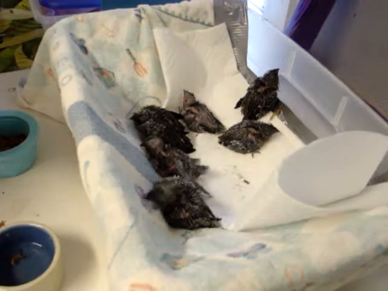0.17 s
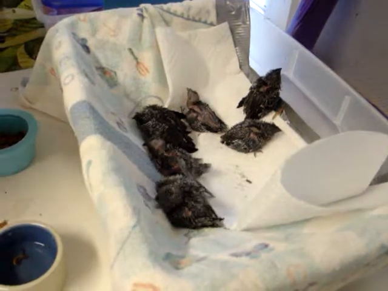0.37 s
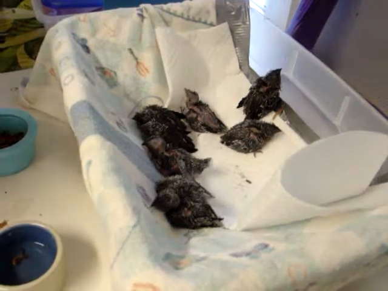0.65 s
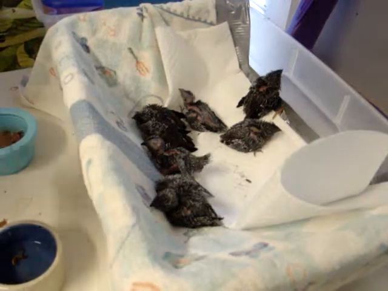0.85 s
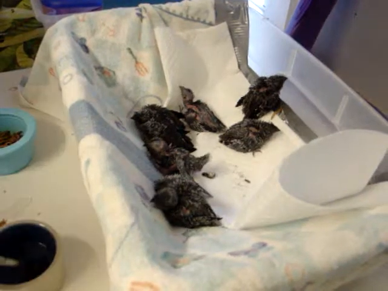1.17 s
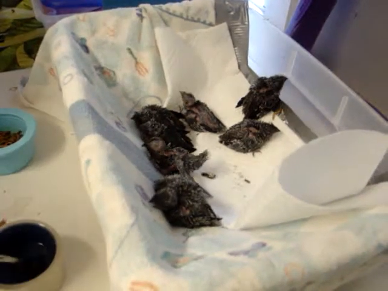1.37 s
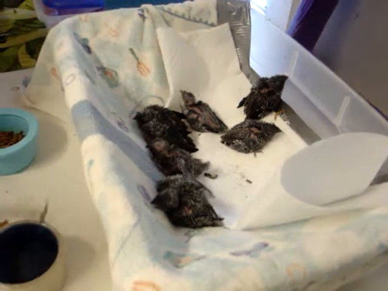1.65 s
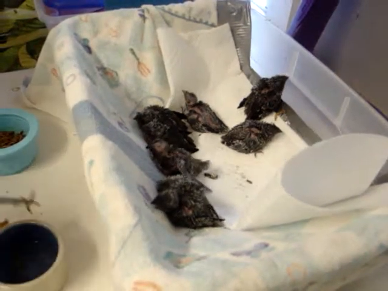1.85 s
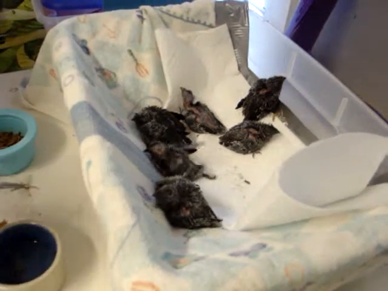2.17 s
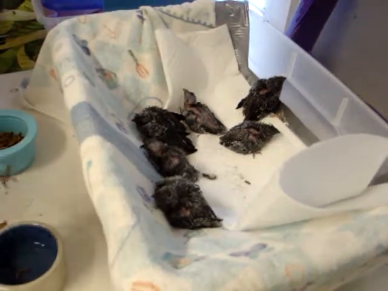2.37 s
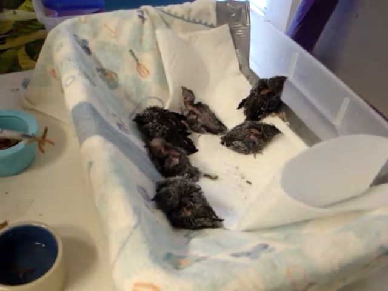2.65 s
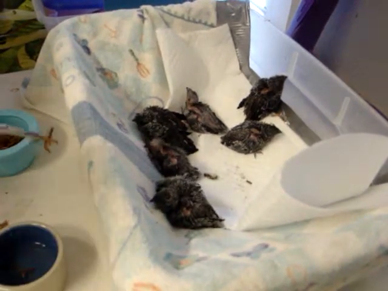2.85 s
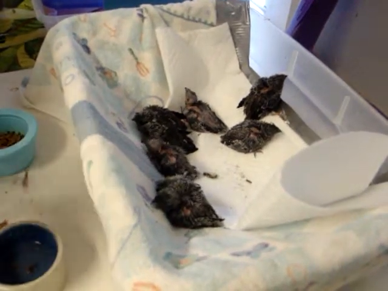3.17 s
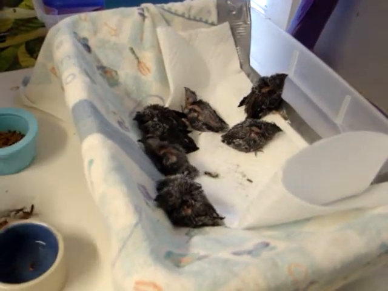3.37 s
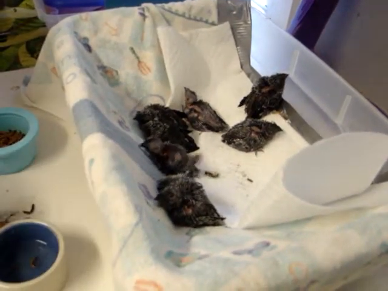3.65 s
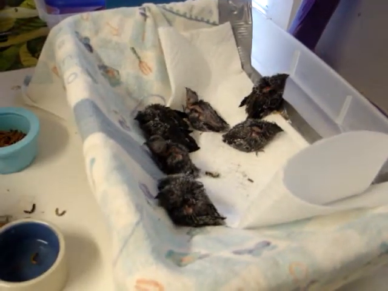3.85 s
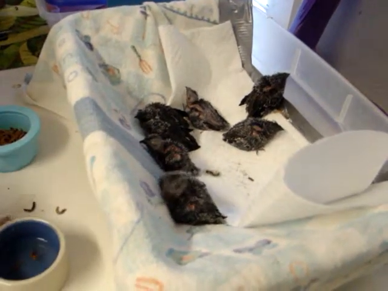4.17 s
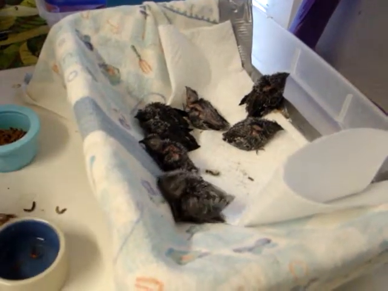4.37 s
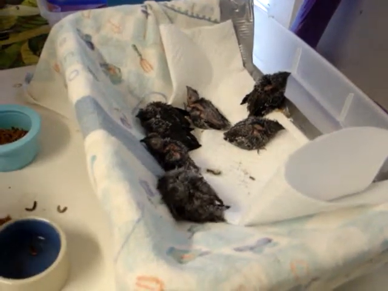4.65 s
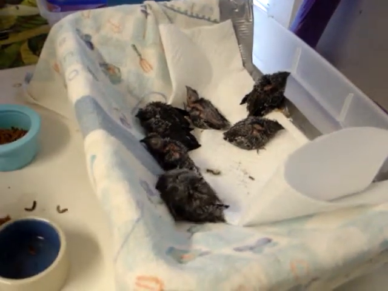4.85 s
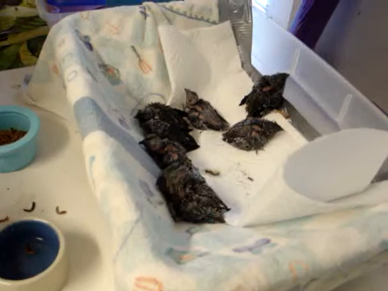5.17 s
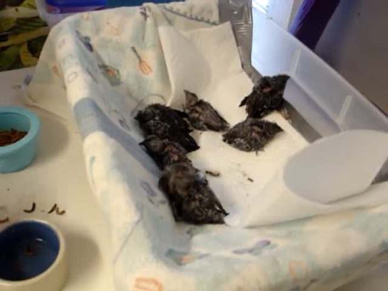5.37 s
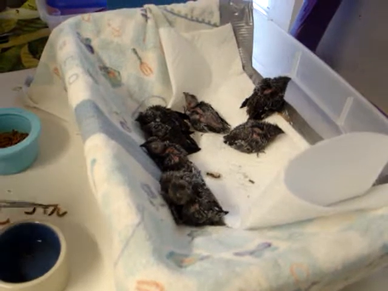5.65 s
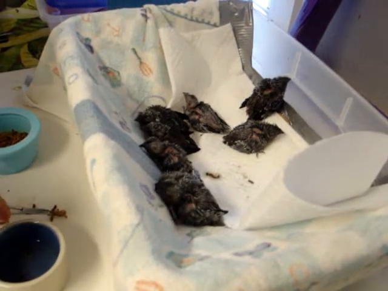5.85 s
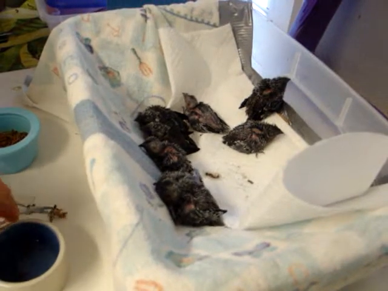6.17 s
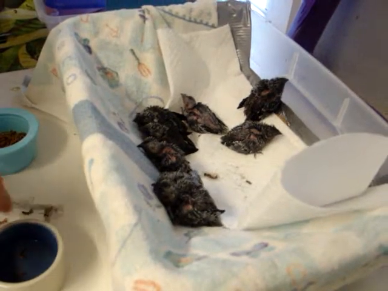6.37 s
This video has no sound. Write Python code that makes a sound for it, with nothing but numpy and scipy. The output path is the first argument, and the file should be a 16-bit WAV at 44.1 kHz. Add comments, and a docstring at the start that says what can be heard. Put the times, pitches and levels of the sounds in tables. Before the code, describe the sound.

Several nestlings beg indoors with sharp tiny chirps, raspy little squawks and hoarse sliding whistles, over a wavering fan drone and soft air noise.

```python
"""Nestlings in a plastic tub beg for food, close to a small microphone in a hard-walled room.
Short arched chirps break into harsh falling squawks; long hoarse whistles slide down, others answer from
further off. Each call is a gliding tone with overtones, made hoarse by random wobble; breath is a rougher copy.
A fan motor and mains hum drone underneath as wavering sines with a bed of air noise; claws scratch on paper.
Noise tails make the echoes of tub and room; the microphone overloads slightly on the loudest calls."""
import sys
import numpy as np
from scipy import signal
from scipy.fft import rfft, irfft
from scipy.io import wavfile
from scipy.ndimage import uniform_filter1d

SR = 44100
rng = np.random.default_rng(int(sys.argv[2]) if len(sys.argv) > 2 else 0)


def to_linear_factor(level_db):
    """Convert decibel levels (scalar or array-like) to linear amplitude factors."""
    exponent = np.asarray(level_db, float) / 20
    return 10 ** exponent


def put_to_file(sound):
    """Save the sound as 16-bit audio at rate SR, in the file named by the first command-line argument."""
    columns = np.atleast_2d(sound).T  # one column per channel
    safe = np.clip(columns, -1, 1)
    whole_steps = np.round(safe * 32767)
    wavfile.write(sys.argv[1], SR, whole_steps.astype(np.int16))


N = 287091  # length in samples


def colour(points, hz):
    """Gain at each pitch, read from a table of (f/Hz, gain/dB) along a logarithmic pitch scale."""
    table = np.array(points, float)
    return to_linear_factor(np.interp(np.log(np.maximum(hz, 1)), np.log(table[:, 0]), table[:, 1]))


def walk(rate_hz, count):
    """Smooth random curve of spread 1 that turns about rate_hz times a second."""
    k = max(int(SR / rate_hz), 2)
    noise = rng.standard_normal(count + 4 * k)
    smooth = uniform_filter1d(uniform_filter1d(noise, k), k)[2 * k:2 * k + count]
    return smooth * np.sqrt(1.5 * k)  # smoothing shrinks the spread; bring it back to 1


def add(out, start_s, x):
    """Mix a sound into out from its start time on."""
    i = max(int(start_s * SR), 0)
    out[i:i + len(x)] += x[:len(out) - i]


def span(length_s):
    """Progress through a note, from 0 to 1."""
    return np.linspace(0, 1, int(length_s * SR))


def swell(u, rise, fall):
    """Loudness curve over a note: rise and fall are shares of its length."""
    fade_in = np.sin(np.pi / 2 * np.clip(u / rise, 0, 1)) ** 2
    fade_out = np.sin(np.pi / 2 * np.clip((1 - u) / fall, 0, 1)) ** 2
    return fade_in * fade_out


# what throat and beak let through: (f/Hz, gain/dB)
THROAT = [(1500, -19.5), (2200, -1), (3200, 1.5), (4400, 6), (6000, 2), (8000, -1), (10000, -14.5)]


def voice(hz, rough, overtone_db, flutter_hz, count=4):
    """A membrane in the syrinx, the bird's voice organ; roughness scatters its overtones into sidebands."""
    phase, out = 2 * np.pi * np.cumsum(hz) / SR, 0
    rough = np.clip(rough, 0, 1)
    for k in range(1, count + 1):
        # random shaking of amplitude and phase replaces the steady tone as roughness grows
        shake = walk(flutter_hz, len(hz)) + 1j * walk(flutter_hz, len(hz))
        wobble = np.sqrt(1 - rough) * np.sqrt(2) + np.sqrt(rough) * shake
        audible = k * hz < .45 * SR
        gain = to_linear_factor(overtone_db * (k - 1)) * colour(THROAT, k * hz) * audible
        out = out + gain * np.imag(wobble * np.exp(1j * k * phase))
    return out


# fan over time: (t/s, shaft tone f/Hz, drone level/dB)
FAN = [(0.0, 75.4, -39.5), (0.69, 75.5, -45), (1.36, 72.8, -48.5), (1.68, 74, -43), (2.55, 73.3, -42),
       (2.96, 70.56, -43), (3.46, 76.7, -37.5), (4.21, 77.1, -36.5), (4.679, 77.11, -38.5),
       (6.47, 76.6, -37), (6.51, 78.7, -36)]
# tones at multiples of the shaft tone: (multiple, relative level/dB)
FAN_ORDERS = [(2, -18), (3, -14), (4, -10), (5, -1.5), (6, -8.5), (7, -8), (8, -15.5)]
# hum lines: (f/Hz, level/dB)
HUM = [(57, -59.5), (69, -51), (120, -47.5), (620, -73.5), (824, -50.5), (904, -57), (964, -54.5),
       (1075, -51), (1130, -56.5), (1529, -55.5)]
# tone colour of the moving air: (f/Hz, relative level/dB)
AIR = [(79, -22), (135, -5), (187, -10), (327, -0.5), (364, -1.5), (413, -4.5), (685, -7.5), (1080, -7),
       (1220, -8.5), (1510, -8.5), (3730, -20.5), (5550, -22.5), (9200, -29.5), (10100, -50), (13100, -66),
       (22000, -120)]


def drone():
    """Fan tones follow the shaft and waver; hum lines keep their pitch but waver too; air is shaped noise."""
    t = np.arange(N) / SR
    s, shaft_hz, db = np.transpose(FAN)
    turn = 2 * np.pi * np.cumsum(np.interp(t, s, shaft_hz)) / SR
    fan, hum = np.zeros(N), np.zeros(N)
    for k, order_db in FAN_ORDERS:
        fan += to_linear_factor(order_db + 2.5 * walk(9, N)) * np.sin(k * turn + .6 * walk(6, N))
    for hz, hum_db in HUM:
        hum += to_linear_factor(hum_db + 2.3 * walk(10.2, N)) * np.sin(2 * np.pi * hz * t + .4 * walk(5.2, N))
    air = irfft(rfft(rng.standard_normal(N)) * colour(AIR, np.fft.rfftfreq(N, 1 / SR)), N)
    tones = np.sqrt(2) * (fan * to_linear_factor(np.interp(t, s, db)) + hum)
    return tones + to_linear_factor(-36.5) * air / air.std()


def arch(u, first_hz, top_hz, last_hz):
    """Pitch curve that climbs to a crest and then drops away faster."""
    crest = 0.62  # share of the length
    climb = np.clip(1 - u / crest, 0, 1)
    drop = np.clip((u - crest) / (1 - crest), 0, 1)
    return top_hz - (top_hz - first_hz) * climb ** 2.3 - (top_hz - last_hz) * drop ** 1.713


# arched chirps: (start t/s, length t/s, top f/Hz, last f/Hz, level/dB)
ARCHES = [(0.023, 0.035, 7670, 5740, -14), (0.286, 0.04, 8250, 4500, -12),
          (0.527, 0.043, 8400, 6500, -16.5), (0.845, 0.03, 8110, 4720, -12),
          (1.144, 0.044, 7820, 5060, -15), (1.367, 0.057, 3860, 2630, -43),
          (1.892, 0.029, 7200, 5600, -21.5), (2.559, 0.035, 7700, 4680, -22.5),
          (2.898, 0.029, 7370, 4260, -20), (3.246, 0.037, 6230, 4770, -21.5),
          (3.925, 0.044, 5590, 3250, -24.5), (4.203, 0.036, 8210, 5900, -24.5),
          (4.56, 0.012, 7930, 7050, -14.5), (4.841, 0.017, 8230, 7530, -22), (4.908, 0.03, 4620, 4980, -32),
          (5.101, 0.029, 7580, 7300, -28), (5.851, 0.035, 7230, 5600, -27.5)]
# plunging chirps: (start t/s, length t/s, first f/Hz, last f/Hz, level/dB)
PLUNGES = [(0.056, 0.01, 5460, 1930, -44), (0.32, 0.0087, 6000, 2230, -41),
           (0.562, 0.015, 5100, 2970, -20.5), (0.871, 0.015, 6120, 2560, -26),
           (1.171, 0.011, 5620, 2600, -19), (1.916, 0.01, 5310, 2340, -21),
           (2.157, 0.021, 5120, 4300, -31.5), (2.583, 0.021, 5000, 2150, -24),
           (2.925, 0.013, 5250, 2950, -33), (3.114, 0.03, 6860, 3360, -28.5),
           (3.266, 0.012, 5385, 2070, -21.5), (3.452, 0.042, 3033, 2310, -30.5),
           (3.731, 0.042, 5690, 2090, -33.5), (3.819, 0.032, 4800, 2490, -33.5),
           (3.956, 0.023, 4950, 2130, -26), (3.982, 0.012, 5170, 2620, -30.5),
           (4.144, 0.048, 5320, 2265, -26.5), (4.239, 0.021, 4290, 2300, -20.5),
           (4.487, 0.026, 5340, 4280, -32), (4.572, 0.018, 4410, 2970, -18.5),
           (4.855, 0.018, 4400, 3120, -15.5), (4.512, 0.03, 4600, 2240, -34.5),
           (5.05, 0.022, 5300, 4700, -35), (5.067, 0.016, 3820, 2670, -29.5),
           (5.086, 0.016, 5040, 3750, -36.5), (5.121, 0.021, 4615, 3080, -15),
           (5.578, 0.022, 4580, 2960, -18), (5.742, 0.007, 2940, 2530, -28.5),
           (5.873, 0.023, 4600, 2166, -18.5)]


def chirp_glides():
    """Start, progress, pitch and level of every chirp; longer plunges cling longer to their first pitch."""
    for s, length, top_hz, last_hz, db in ARCHES:
        u = span(length)
        yield s, u, arch(u, 0.7 * top_hz, top_hz, last_hz), db
    hold_s = 0.022
    for s, length, first_hz, last_hz, db in PLUNGES:
        u = span(length)
        yield s, u, first_hz + (last_hz - first_hz) * u ** (1 + length / hold_s), db


def chirps(out):
    """Thin glides inside a haze of breath; low-pitched ones carry stronger overtones."""
    for s, u, hz, db in chirp_glides():
        count = len(u)
        overtone_db = -8 if hz.max() < 3300 else -22
        # the slacker the membrane, the lower and the more ragged the tone
        slack = np.clip((7200 - hz) / 3000, .2, .55)
        if hz[0] < 3300:
            slack = .06  # a smaller bird's low peeps stay clear
        line = voice(hz, slack, overtone_db, 984)
        # the tone comes in beads, around 210 a second
        bead_hz = 210 + 50 * walk(67.6, count)
        beads = 1 + 0.54 * np.sin(2 * np.pi * np.cumsum(bead_hz) / SR + 2 * np.pi * rng.random())
        # every other cycle differs a little: a faint strand at half pitch
        line += to_linear_factor(-27 + 6 * walk(120, count)) * voice(hz / 2, .85, 0, 1400, count=1)
        # air rushing past the membrane, in gusts, growing towards the end of the glide
        gusts = to_linear_factor(-7.5 + 8.7 * np.clip(walk(246, count), -3, 1.2))
        breath = gusts * (0.082 + u) * voice(hz, 0.91, -10.5, 5000, count=2)
        add(out, s, to_linear_factor(db) * swell(u, 0.42, 0.2) * (beads * line + breath))


# low rasping squawks and peeps: (start t/s, length t/s, first f/Hz, level/dB, roughness: 0 clear, about 1 raspy)
SQUAWKS = [(0.049, 0.04, 2697, -26.5, 0.8), (0.32, 0.023, 3054, -31, 0.8), (0.724, 0.03, 3340, -35.5, 0.05),
           (0.872, 0.02, 2994, -26, 0.37), (1.18, 0.037, 2850, -28.5, 0.6),
           (1.559, 0.024, 3050, -34.5, 0.2), (1.797, 0.02, 3230, -43, 0.08), (1.913, 0.047, 3100, -25, 0.5),
           (2.165, 0.047, 2645, -35.5, 0.88), (2.294, 0.057, 3330, -26, 0.78),
           (2.472, 0.035, 2840, -33, 1.2), (2.59, 0.042, 2636, -26, 0.9), (2.922, 0.045, 3205, -26, 0.74),
           (3.263, 0.038, 3053, -24.5, 0.53), (3.79, 0.035, 3310, -31, 0.1), (3.84, 0.022, 2500, -42, 0.5),
           (3.958, 0.039, 2377, -31, 1), (4.236, 0.027, 2400, -25.5, 0.5), (4.581, 0.039, 2540, -30.5, 0.8),
           (4.873, 0.027, 2404, -27, 0.08), (5.145, 0.041, 2760, -33.5, 0), (5.585, 0.029, 2395, -32, 0),
           (5.758, 0.022, 2310, -30, 0.08), (5.887, 0.063, 2376, -30, 0.7)]


def squawks(out):
    """The pitch settles like a relaxing spring; rougher means wider sidebands and richer overtones."""
    rest_hz = 2125
    for s, length, first_hz, db, rough in SQUAWKS:
        u = span(length)
        hz = rest_hz + (first_hz - rest_hz) * np.exp(-3 * u)
        tone = voice(hz, rough, -5 + 3 * rough, 700 + 2500 * rough)
        level = to_linear_factor(db + 4.6 * rough * walk(220, len(u)))
        add(out, s, level * swell(u, 0.07, 0.62) * tone)


# whistles of birds further off: (start t/s, length t/s, first f/Hz, last f/Hz, level/dB)
DISTANT = [(0.118, 0.16, 6230, 5220, -33.5), (0.333, 0.08, 5670, 5510, -31),
           (0.99, 0.25, 5340, 5250, -41.5), (1.059, 0.26, 6170, 6000, -41), (1.202, 0.12, 6600, 6200, -37),
           (1.316, 0.05, 6200, 5250, -35.5), (1.468, 0.458, 5650, 5910, -39.5),
           (1.527, 0.39, 6450, 6070, -44), (1.791, 0.068, 8000, 8070, -42.5),
           (1.956, 0.18, 6500, 7220, -41.5), (2.005, 0.14, 4750, 5260, -45.5),
           (2.631, 0.078, 5400, 5180, -39.5), (2.84, 0.028, 5020, 5120, -40),
           (3.158, 0.16, 6520, 6100, -49), (4.311, 0.18, 5140, 5380, -43.5),
           (5.015, 0.042, 7400, 6470, -43), (5.171, 0.24, 7500, 6530, -42),
           (5.454, 0.048, 5080, 4940, -38.5)]


def distant():
    """Hoarse whistles from further away: a single wobbling tone whose level dips at random."""
    out = np.zeros(N)
    for s, length, first_hz, last_hz, db in DISTANT:
        u = span(length)
        tone = voice(first_hz + (last_hz - first_hz) * u, .42, 0, 600, count=1)
        level = to_linear_factor(db - 9.1 * np.maximum(walk(51, len(u)), 0))
        add(out, s, level * swell(u, 0.055, 0.21) * tone)
    return out


# long begging whistles: (start t/s, length t/s, first f/Hz, level/dB, attack t/s)
WHISTLES = [(0.623, 0.18, 6093, -18.5, 0.013), (2.265, 0.19, 6210, -16, 0.016),
            (3.33, 0.21, 6190, -15.5, 0.046), (4.556, 0.21, 6184, -14.5, 0.05),
            (6.011, 0.24, 6016, -17.5, 0.014)]
# short straight whistles, mostly run-ups to a long one: (start t/s, length t/s, first f/Hz, last f/Hz, level/dB)
RUN_UPS = [(0.561, 0.04, 5040, 5330, -23.5), (0.61, 0.03, 5400, 6100, -26), (2.132, 0.062, 6450, 5820, -29),
           (2.207, 0.13, 5860, 5530, -31.5), (2.247, 0.02, 6300, 6250, -30.5),
           (3.295, 0.082, 5600, 6000, -24.5), (4.473, 0.049, 6320, 5830, -26.5),
           (4.537, 0.022, 5680, 5810, -28.5), (5.485, 0.09, 6350, 5420, -31)]


def whistle_glides():
    """Start, progress, pitch and level of every whistle; long ones sag late and fade, run-ups glide straight."""
    for s, length, first_hz, db, attack_s in WHISTLES:
        u = span(length)
        entry_db = -4.5 * np.clip(1 - u * length / attack_s, 0, 1)
        fade_db = -18 * u ** 3.96
        yield s, u, first_hz * (1 - 0.3 * u ** 2.3), db + entry_db + fade_db
    for s, length, first_hz, last_hz, db in RUN_UPS:
        u = span(length)
        yield s, u, first_hz + (last_hz - first_hz) * u, db + 3.2 * walk(100, len(u))


def whistles():
    """Sliding whistles with a pair of flutter sidebands; hoarser and breathier towards the end."""
    out = np.zeros(N)
    for s, u, hz, db in whistle_glides():
        # the pitch sags further and wavers as the breath runs out
        hz = hz * (1 - .07 * u ** 8 + 0.035 * u ** 2 * walk(90, len(u)))
        flutter_hz = 330 + 60 * walk(40, len(u))
        flutter = 1 + 0.13 * np.sin(2 * np.pi * np.cumsum(flutter_hz) / SR)
        tone = flutter * voice(hz, 0.1 + 0.45 * u ** 2.5, -3.5, 900, count=2)
        breath = to_linear_factor(-10.5) * u ** 3 * voice(hz, 0.77, -9.5, 1300, count=2)
        add(out, s, to_linear_factor(db) * swell(u, 0.018, 0.13) * (tone + breath))
    return out


# gaps of a few milliseconds where a whistle and its echo nearly vanish:
# (middle t/s, size t/ms; the gap reaches about 0.83 sizes each way)
GAPS = [(0.673, 5), (0.6936, 4.1), (0.702, 1.9), (2.2036, 7.6), (2.2653, 2.9), (2.279, 1.8), (2.2843, 2),
        (2.3345, 2), (2.4198, 3.3), (3.3261, 2.6), (3.336, 2.3), (3.3523, 3), (3.3605, 5.6), (3.3752, 2.4),
        (3.403, 6.9), (4.595, 4.1), (4.646, 2.6), (4.656, 4.1), (4.687, 2.4), (6.047, 4.8), (6.118, 2.9),
        (6.135, 4.2), (6.157, 2.7), (6.209, 2.6)]


def gaps():
    """Gain that nearly closes at each listed gap, and at random, mostly shorter gaps in long whistles."""
    every_s, size_ms = 0.06, 2.0  # average spacing and size of the random gaps
    t, gain = np.arange(N) / SR, np.ones(N)
    chance = rng.random((300, 2))
    times = .03 + np.cumsum(2 * every_s * chance[:, 0])
    random_gaps = []
    for s, c in zip(times, chance[:, 1]):
        if any(0 < s - w[0] < .85 * w[1] for w in WHISTLES):
            random_gaps.append((s, size_ms * (.5 + c)))
    for s, gap_ms in GAPS + random_gaps:
        near = slice(int((s - .02) * SR), int((s + .02) * SR))
        gain[near] *= 1 - 0.98 * np.exp(-((t[near] - s) / (0.00083 * gap_ms)) ** 4)
    return gain


# one warble on both sides of the syrinx: (start t/s, length t/s, first f/Hz, last f/Hz, swing f/Hz, level/dB)
WARBLE = [(1.224, 0.13, 3050, 2400, 345, -32.5), (1.221, 0.12, 3900, 2100, 328, -34.5)]


def warble(out):
    """Two tones swing up and down together; the swing dies away."""
    rate_hz, crest_s = 40, 1.2775  # both tones crest at the same moment
    for s, length, first_hz, last_hz, swing_hz, db in WARBLE:
        u = span(length)
        swing = np.cos(2 * np.pi * rate_hz * (s + u * length - crest_s)) * swell(u, 0.084, 0.4)
        hz = first_hz + (last_hz - first_hz) * u ** 3 + swing_hz * swing
        add(out, s, to_linear_factor(db) * swell(u, .1, .15) * voice(hz, .15, -20, 500, count=2))


# scratches of claws on paper: (start t/s, level/dB before filtering, centre f/Hz)
SCRATCHES = [(3.719, -22.5, 2590), (6.317, -17, 1730), (6.3766, -15.5, 1740), (6.4288, -22.5, 1770)]


def scratches(out):
    """Short dull bursts: filtered noise that dies away at once."""
    for s, db, hz in SCRATCHES:
        t = span(0.08) * 0.08
        band = signal.butter(1, [0.71 * hz, 1.25 * hz], "bandpass", fs=SR, output="sos")
        noise = signal.sosfilt(band, rng.standard_normal(len(t)))
        add(out, s, to_linear_factor(db) * np.exp(-t / 0.024276) * noise)


def echo(t60_s, treble_t60_s, gap_s):
    """Diffuse noise tail of energy 1 that starts after a gap; t60 is the time to fall by 60 dB."""
    t = span(.6) * .6
    noise = rng.standard_normal(len(t))
    low = signal.sosfiltfilt(signal.butter(2, 6500, fs=SR, output="sos"), noise)
    low_tail = low * np.exp(-np.log(1000) * t / t60_s)
    treble_tail = (noise - low) * np.exp(-np.log(1000) * t / treble_t60_s)
    tail = (low_tail + treble_tail) * np.clip(t / gap_s - 1, 0, 1)
    return tail / np.sqrt(np.sum(tail ** 2))


def scene():
    """Near birds with tub and room echoes, far birds with room echo only, and the drone."""
    near = np.zeros(N)
    for source in (chirps, squawks, warble, scratches):
        source(near)
    # a tiny beak radiates almost nothing low down; the scratches pass the same filter
    near = signal.sosfilt(signal.butter(4, 1750, "highpass", fs=SR, output="sos"), near)
    long, far = whistles(), distant()
    tub = to_linear_factor(-16) * echo(0.064, 0.064, 0.0011)
    room = echo(0.34, 0.21, 0.0031)
    near = near + signal.fftconvolve(near, tub + to_linear_factor(-11.5) * room)[:N]
    # the whistler faces away, so more of it arrives by the walls
    long = long + signal.fftconvolve(long, tub + to_linear_factor(-5) * room)[:N]
    far = far + signal.fftconvolve(far, to_linear_factor(-17.5) * room)[:N]
    # the gaps cut the whistles together with their echoes
    return (near + long * gaps() + far + drone())[None]


def low_pass(x):
    """Removes everything above the highest recorded frequency."""
    return signal.sosfilt(signal.butter(12, 10220, fs=SR, output="sos"), x)


def record(dry):
    """Gain control turns loud calls down and recovers; a lopsided input adds soft thumps and rounds peaks."""
    hold = np.exp(-1 / (.35 * SR))  # loudness is averaged over about 0.35 s
    loudness = signal.lfilter([1 - hold], [1, -hold], dry ** 2)
    x = dry * (1 + loudness / to_linear_factor(-22) ** 2) ** -.12
    # the squared part is the lopsidedness: it turns loud calls into low thumps
    lopsided = x + 0.14 * x ** 2
    x = signal.sosfilt(signal.butter(1, 18, "highpass", fs=SR, output="sos"), lopsided)
    x = .8 * np.tanh(x / .8)
    # the treble is cut steeply above 10150 Hz
    x = signal.sosfilt(signal.ellip(10, .3, 65, 10150, fs=SR, output="sos"), x)
    return low_pass(x)


dry = scene()
out = record(dry)
put_to_file(out)
```